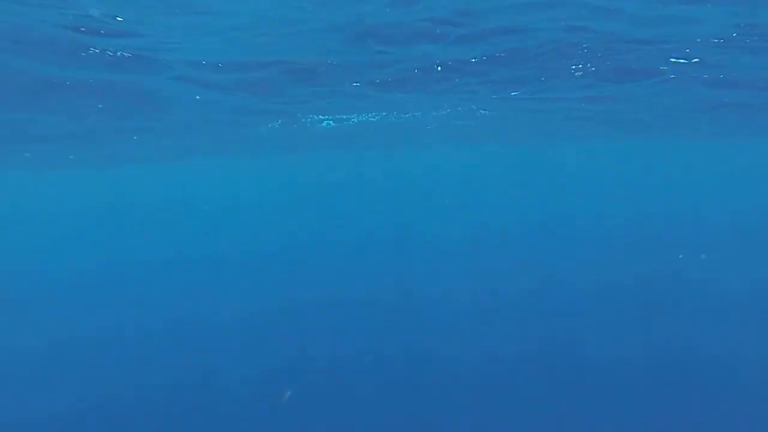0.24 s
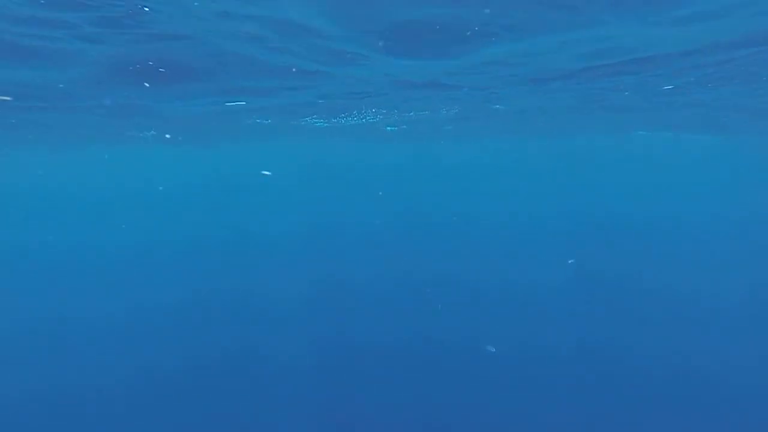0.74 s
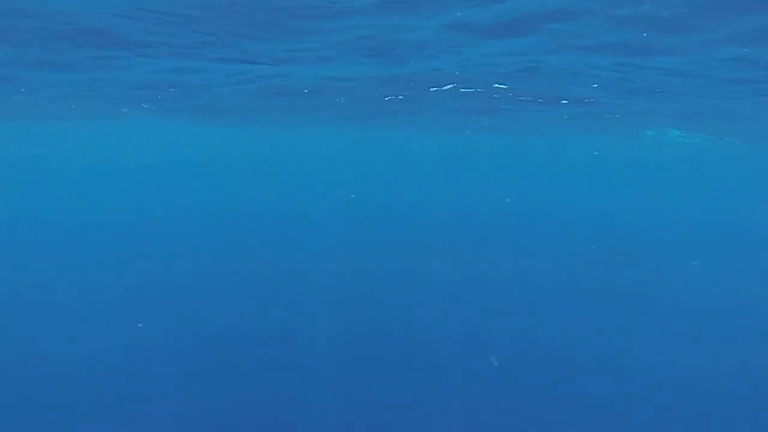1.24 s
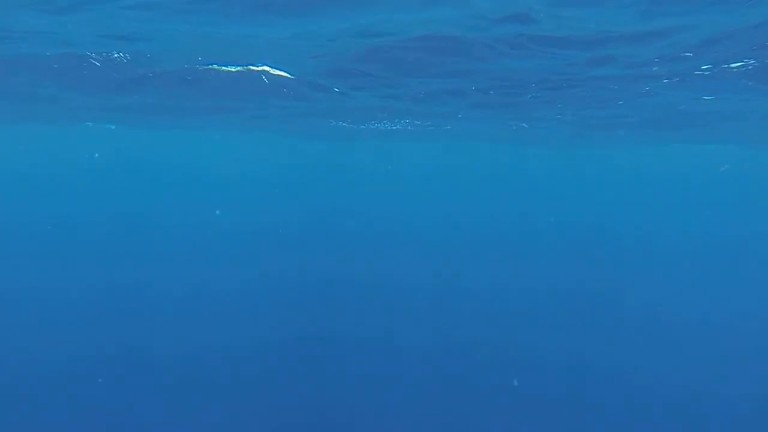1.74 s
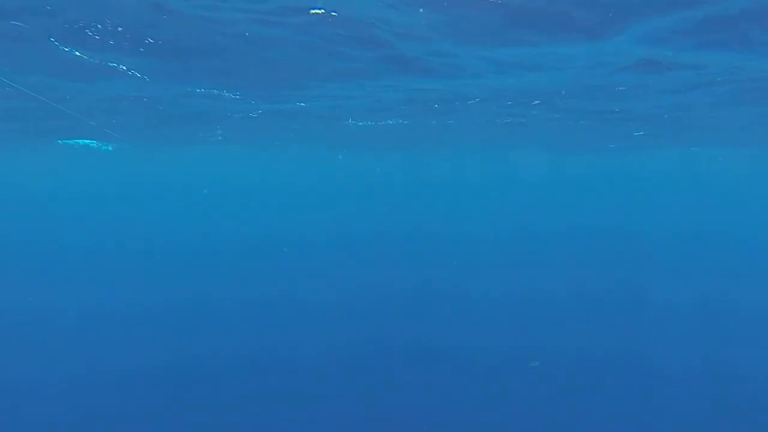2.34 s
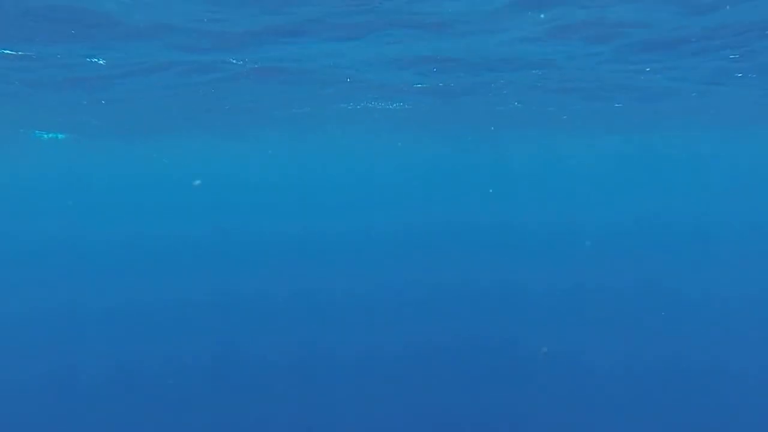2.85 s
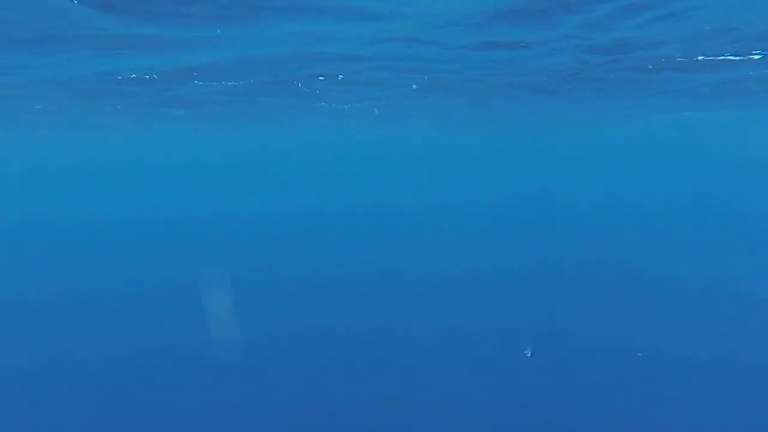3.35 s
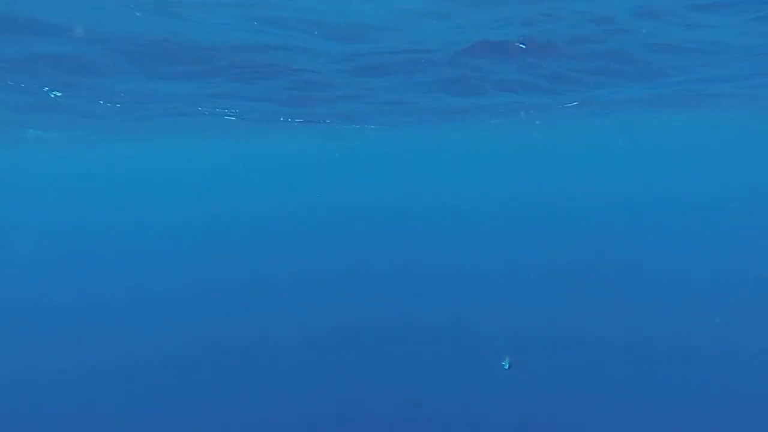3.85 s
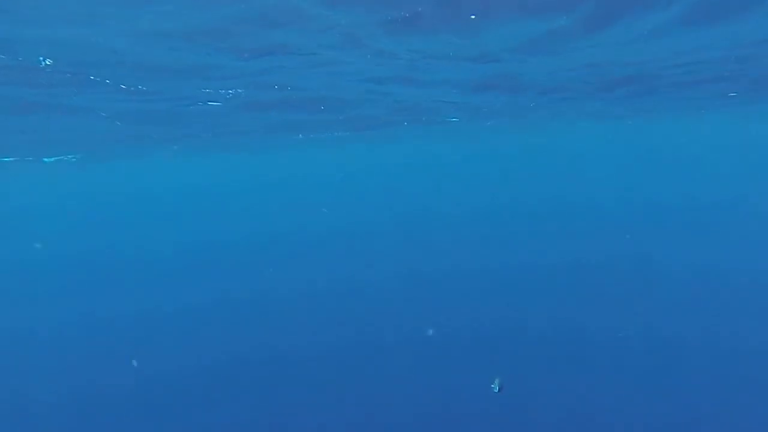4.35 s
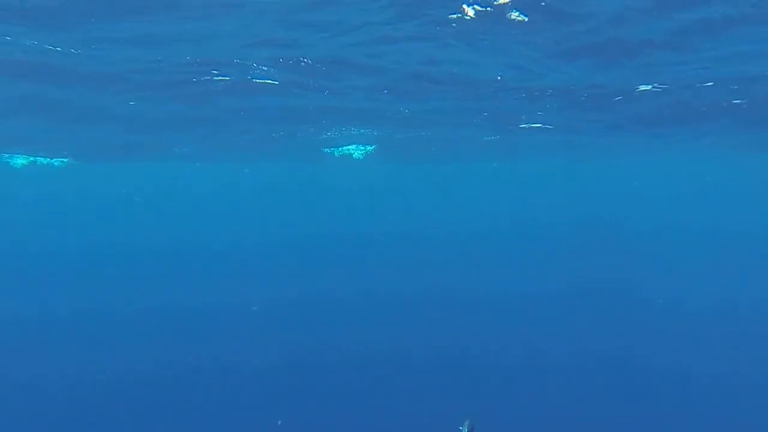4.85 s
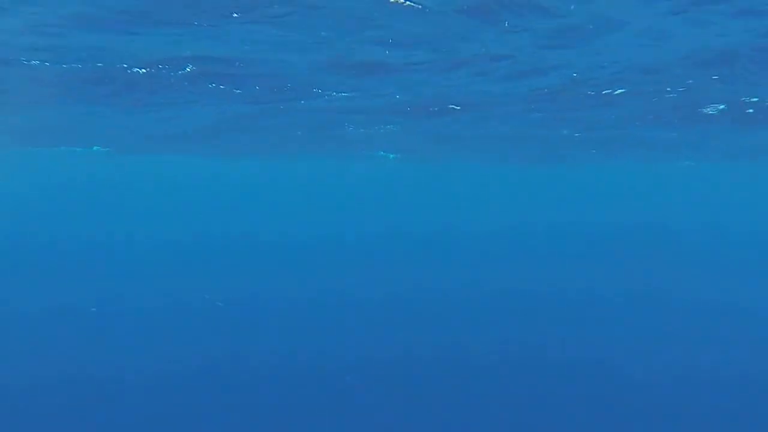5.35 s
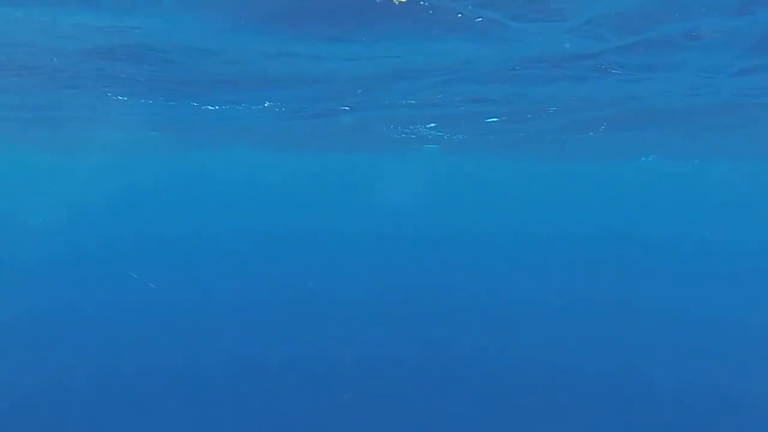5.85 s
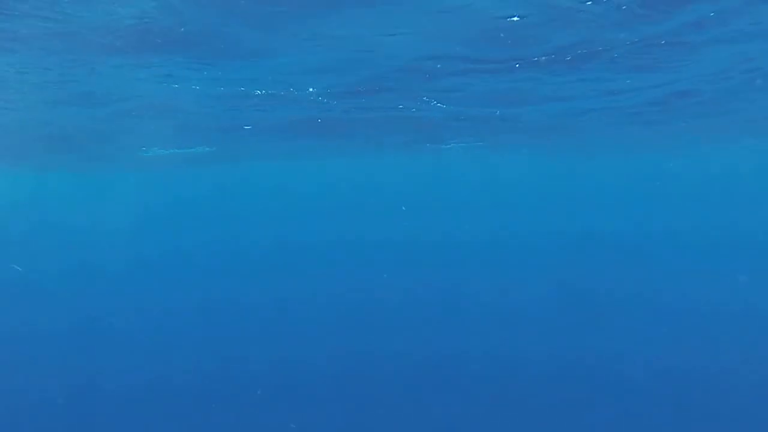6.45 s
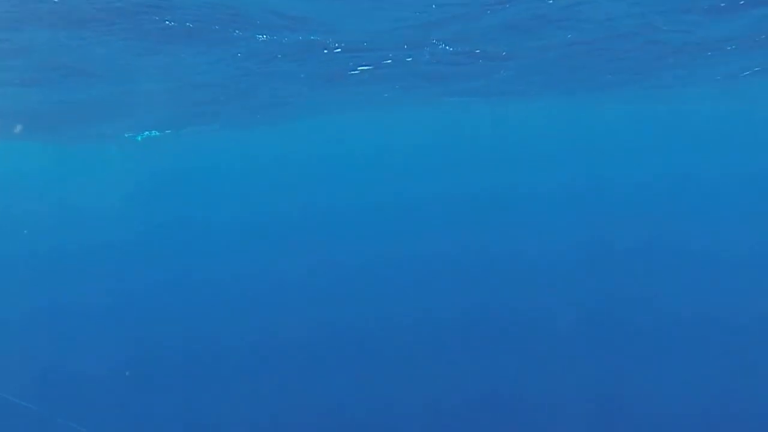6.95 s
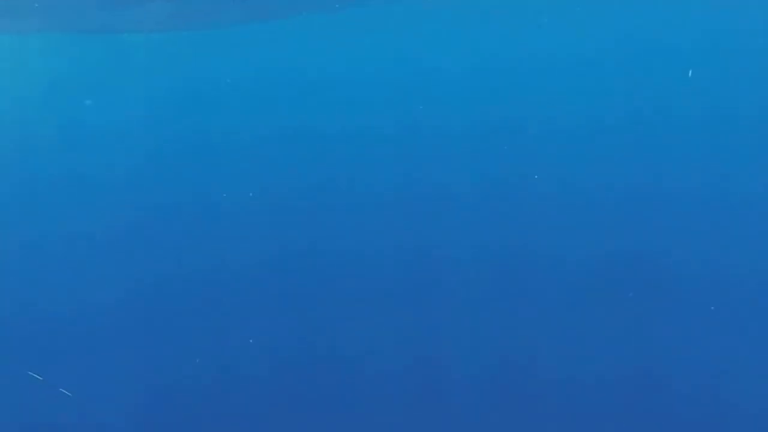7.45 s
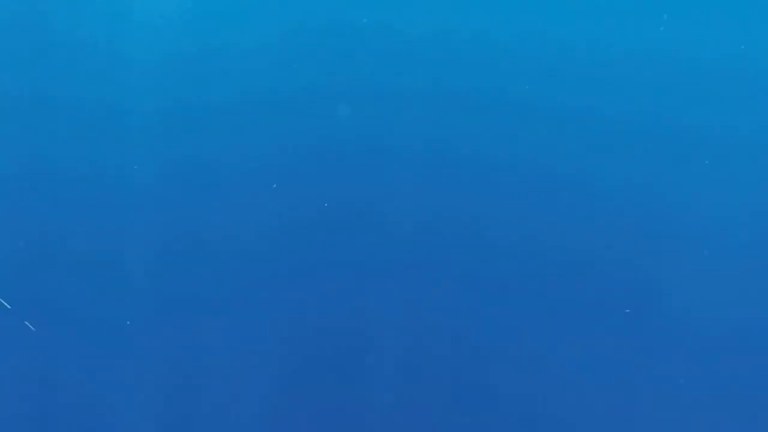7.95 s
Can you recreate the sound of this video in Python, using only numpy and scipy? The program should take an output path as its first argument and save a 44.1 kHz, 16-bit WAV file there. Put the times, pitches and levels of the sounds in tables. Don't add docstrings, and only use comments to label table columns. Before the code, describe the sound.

A deep, uneven diesel drone with rapid dull clatter heard beneath the waves, swelling and fading, with low watery thuds and a few tiny clicks.

```python
import sys
import numpy as np
from scipy import signal
from scipy.fft import rfft, irfft, next_fast_len
from scipy.io import wavfile
from scipy.ndimage import uniform_filter1d

SR = 44100
rng = np.random.default_rng(int(sys.argv[2]) if len(sys.argv) > 2 else 0)


def wav_out(sig):
    wavfile.write(sys.argv[1], SR, np.round(np.clip(np.atleast_2d(sig).T, -1, 1) * 32767).astype(np.int16))


def ratio(d):
    e = np.asarray(d, float) / 20
    return 10 ** e


N = 361619

FIRING_HZ, CYLINDERS = 35, 6
CYCLE_HZ = FIRING_HZ / CYLINDERS


def level(x, db):
    return x * ratio(db) / np.sqrt(np.mean(x ** 2))


def shape_db(table, hz):
    f, db = np.transpose(table)
    return np.interp(np.log(np.maximum(hz, 1)), np.log(f), db)


def noise(table):
    size = next_fast_len(N, True)
    hz = np.arange(size // 2 + 1) * SR / size
    spectrum = rfft(rng.standard_normal(N), size) * ratio(shape_db(table, hz))
    return level(irfft(spectrum, size)[:N], 0)


def ring(x, hz, width_hz):
    b, a = signal.iirpeak(min(hz, .45 * SR), hz / width_hz, fs=SR)
    return signal.lfilter(b, a, x)


def walk(rate):
    k = int(SR / rate)
    held = np.repeat(rng.standard_normal(N // k + 1), k)
    return 1.53 * uniform_filter1d(uniform_filter1d(held, k), k)[:N]


# (time [s], lag [ms])
HUNTING = [(0, -13.1), (.3, -10.7), (.66, -10.1), (1.38, -17.3), (2.1, -10), (2.38, -12), (2.8, -19.3),
           (3.0, -19.4), (3.45, -15.1), (4.35, -16.9), (4.68, -14), (5.55, -19.5), (5.97, -16), (6.22, -9),
           (6.85, -16), (7.2, -16.2), (7.75, -14.1), (8.0, -16.1)]


def crank(t):
    lag_ms = uniform_filter1d(np.interp(t, *np.transpose(HUNTING)), SR // 8)
    return CYCLE_HZ * (t - lag_ms / 1000)


# (order [cycles], level re its band [dB])
STRONG_ORDERS = [(6, -8), (12, -6), (15, -8.5), (18, -7.5), (21, -5.5), (30, -15.5), (36, -19),
                 (42.15, -14.5), (48, -25), (54.2, -18), (58, -31), (66, -34)]
# (frequency [Hz], level re its band [dB])
UNEVEN_CYLINDERS = [(30, -18), (60, -17), (110, -21), (150, -23), (205, -23), (240, -30), (330, -36),
                    (400, -44)]
LAYER_EDGES = [60, 110]
HULL_BORNE = [42.15, 54.2]
BEAT_ORDER, BEAT_S, BEAT_NULL_S, BEAT_DEPTH = 42.15, .591, 7.0, 0.82


def drone(cycles, gains):
    strong = np.array(STRONG_ORDERS)
    weak = np.setdiff1d(np.arange(5, 72), np.round(strong[:, 0]))
    weak_db = shape_db(UNEVEN_CYLINDERS, weak * CYCLE_HZ) + 3.25 * rng.standard_normal(len(weak))
    orders = np.r_[strong[:, 0], weak]
    levels_db = np.r_[strong[:, 1], weak_db]
    out = 0
    for order, db in zip(orders, levels_db):
        gain = gains[np.searchsorted(LAYER_EDGES, order * CYCLE_HZ)]
        if order in HULL_BORNE:
            gain = np.sqrt(gain * np.mean(gain)) * ratio(2.2 * walk(9) - .5)
        fade = 1 + .22 * walk(4)
        if order == BEAT_ORDER:
            beat = np.sin(np.pi * (np.arange(N) / SR - BEAT_NULL_S) / BEAT_S)
            fade = fade * (np.sqrt(2) * BEAT_DEPTH * beat + 1 - BEAT_DEPTH)
        tone = np.cos(2 * np.pi * (order * cycles + rng.random()))
        out = out + np.sqrt(2) * ratio(db) * gain * fade * tone
    return out


# (lead [ms], knock [dB], delay of second knock [ms], its level [dB],
# extra level on the heavy panels [dB])
CYLINDER_HABIT = [(5, .8, 4, -4, .5), (6.5, -.2, 6, -2.5, -1.5), (4.8, 1.3, 4, -4.5, 3),
                  (6.5, -1.2, 6.5, 0, -1.5), (5, -1, 5, -2.5, 2.5), (6.5, -.6, 8, -3, -3)]
# (time ahead of the knock [ms], level re the knock [dB],
# level of the knock in the valve cover [dB])
VALVE_SEATING = [(8.5, -8, -1), (5, -14, 1), (9, -9, -3), (8, -17, -3), (7.5, -8, 3), (9, -19, -2)]
# (time [s], level [dB])
HARD_FIRINGS = [(0.044, -1.8), (0.188, -2.3), (0.246, -2.0), (0.533, 2.9), (0.704, -2.0), (1.043, 2.9),
                (1.185, -1.6), (1.671, -1.7), (2.36, -2.2), (2.472, 2.4), (2.697, -2.8), (2.866, -3.0),
                (2.923, 3.4), (2.952, 2.9), (3.384, -2.5), (3.442, -1.8), (3.471, -2.1), (3.528, 2.5),
                (3.556, -2.7), (3.613, -3.0), (3.756, -2.4), (3.813, -1.7), (4.297, 5.2), (4.499, 2.7),
                (4.956, 2.6), (5.154, -1.9), (5.24, 2.3), (5.296, -1.8), (5.382, -2.0), (5.524, -2.9),
                (5.667, -1.8), (5.725, 2.7), (5.811, -1.6), (5.84, -2.3), (5.869, -2.5), (5.955, 2.4),
                (6.19, -2.5), (6.304, -1.7), (6.361, 2.3), (6.474, -3.7), (6.53, 2.3), (6.87, -1.8),
                (7.041, 3.6), (7.127, -1.9), (7.155, 2.9), (7.499, -2.5), (7.557, -3.9), (7.585, 2.3),
                (7.671, -1.7), (7.729, -1.8), (7.757, -2.3), (7.786, 3.4), (7.871, -2.6), (7.899, 2.4),
                (7.927, 2.5), (7.984, -1.7)]


def blows(cycles):
    firing = np.arange(1, int(cycles[-1] * CYLINDERS) + 1)
    at = np.interp(firing / CYLINDERS, cycles, np.arange(N)) / SR
    accent_db = np.zeros(len(firing))
    for s, db in HARD_FIRINGS:
        accent_db[np.argmin(np.abs(at - s))] = 1.1 * db
    chance = rng.standard_normal((len(firing), 6))
    age = np.arange(SR // 20) / SR
    habit = rng.standard_normal((CYLINDERS, len(age)))
    share = .4
    push = np.hanning(15) / 7
    crack_decay = (1 - np.exp(-age / 0.001)) * (np.exp(-age / 0.0028) + ratio(-14) * np.exp(-age / 0.034))
    rattle_decay = ratio(9.5) * (1 - np.exp(-age / 0.00077)) * np.exp(-age / 0.0067)
    bright, dull, rasp, cover = np.zeros((4, N + SR))
    for k, s, luck, hard_db in zip(firing % CYLINDERS, at, chance, accent_db):
        lead_ms, db, after_ms, after_db, dull_db = CYLINDER_HABIT[k]
        ahead_ms, valve_db, cover_db = VALVE_SEATING[k]
        cracks = np.sqrt(share) * habit[k] + np.sqrt(1 - share) * rng.standard_normal(len(age))
        single = cracks * crack_decay
        single[:len(push)] += ratio(26) * push
        later = int(np.clip(after_ms + 0.47 * luck[0], 1, 20) * SR / 1000)
        blow = single.copy()
        blow[later:] += ratio(after_db + 0.22 * luck[1]) * single[:-later]
        rattle = cracks * rattle_decay

        i = int((s - (lead_ms - .8 + .4 * luck[2]) / 1000) * SR)
        late = i + SR // 1200
        early = i - int(ahead_ms * SR / 1000)
        bright[i:i + len(age)] += ratio(db + hard_db + 0.22 * luck[3]) * blow
        dull[late:late + len(age)] += ratio(db + hard_db + dull_db + 0.25 * luck[4]) * blow
        rasp[i:i + len(age)] += ratio(1.2 * (db + hard_db)) * rattle
        cover[i:i + len(age)] += ratio(cover_db + .6 * hard_db) * (rattle + 0.67 * blow)
        tick = ratio(valve_db + 2.6 * luck[5]) * single
        for path, path_db in ((bright, -3), (dull, -1.5), (rasp, -2.5), (cover, 5)):
            path[early:early + len(age)] += ratio(path_db) * tick
    return bright[:N], dull[:N], rasp[:N], cover[:N]


def mode(x, hz, width_hz, db):
    return ratio(db) * ring(ring(x, hz, 2.18 * width_hz), hz, 1.32 * width_hz) / np.sqrt(width_hz)


HULL_CENTRES = [400, 520, 660, 735, 880, 1180, 1355, 1650, 1945]
# (width [Hz], level [dB])
HULL_MODES = [(130, -1), (100, 1.5), (96, 2.5), (58.5, -12.5), (88, -5), (156, -23), (120, 3.5),
              (134.6, 9.5), (127, -0.5)]
INVERTED_PANELS = [880]
# (frequency [Hz], width [Hz], level [dB])
THIN_PLATES = [(2586, 84, -23), (2720, 140, -21), (2920, 170, -22.5), (3263, 200, -22), (3644, 190, -25),
               (4140, 180, -28), (4260, 820, -39)]
# (frequency [Hz], width [Hz], level [dB])
VALVE_COVER = (2250, 170, -18.5)
LATE_PANEL_HZ, LATE_SAMPLES = 1945, 6
PLATE_STEADY = 0.71


def knock(cycles, gain):
    bright, dull, rasp, cover = blows(cycles)
    wash = ratio(-10) * rng.standard_normal(N)
    hull = 0
    for hz, (width_hz, db) in zip(HULL_CENTRES, HULL_MODES):
        force = dull + .55 * wash if hz < 1000 else bright + wash
        if hz == LATE_PANEL_HZ:
            force = np.roll(force, LATE_SAMPLES)
        sign = -1 if hz in INVERTED_PANELS else 1
        hull = hull + sign * mode(force, hz, width_hz, db)
    plates = -mode(cover + wash, *VALVE_COVER)
    for k, row in enumerate(THIN_PLATES):
        plates = plates + (-1) ** k * mode(rasp + 2 * wash, *row)
    escape = (np.mean(gain) / gain) ** PLATE_STEADY
    return gain * level(hull + plates * escape, 0)


# (order [cycles], level re the middle layer [dB])
GEAR_MESH = [(89.7, -40), (125.5, -34), (151, -35), (156, -38)]


def gears(cycles):
    out = 0
    for order, db in GEAR_MESH:
        out = out + np.sqrt(2) * ratio(db + walk(5.3)) * np.cos(2 * np.pi * order * cycles)
    return out


# (frequency [Hz], density [dB per Hz])
DEEP_RUMBLE = [(6, -7.5), (16, -29), (26, -5.5), (38, 13), (50, -8), (65, -19), (90, -39.5), (300, -120)]
# (frequency [Hz], density [dB per Hz])
LOW_SLOSH = [(25, -55), (45, -39.5), (62, -28.5), (85, -10), (105, -1.5), (120, -5.5), (150, -50),
             (400, -120)]
# (frequency [Hz], density [dB per Hz])
CHURNED_WATER = [(50, -58.5), (90, -22.5), (110, -20), (125, -24.5), (150, -31), (200, -37), (300, -38.5),
                 (370, -38.5), (600, -46), (1050, -50), (3000, -130)]


def water(deep, low, middle):
    rumble = ratio(-2.5) * deep * noise(DEEP_RUMBLE)
    slosh = ratio(-5.5) * low * noise(LOW_SLOSH)
    churn = ratio(-10.5) * middle * noise(CHURNED_WATER)
    return rumble + slosh + churn


# (time [s], level [dB])
SWELL_LEVEL = [(0, -2), (.8, 2.5), (1.6, -0.5), (2.0, 0.7), (2.4, 1.5), (2.94, 4.5), (3.15, 3.5),
               (3.45, -3), (3.82, -4), (4.2, 3), (4.6, 4), (4.92, 3), (5.2, -0.5), (5.75, -1), (6.2, 3),
               (6.95, 1), (7.6, 4), (7.98, 7)]
# (level in a mean swell [dB], share of the swell followed [ratio],
# gain while sinking [dB per s])
LAYER_LEVELS = [(-35, 0.87, 0.5), (-38, 0.55, 16.5), (-36.5, 1.75, -1), (-48.5, 0.61, -0.7)]
# (time [s], length [s], deep level change [dB], low level
# change [dB])
LAYER_SWINGS = [(0.352, 0.12, 1, -3), (0.57, 0.12, -3, 4.5), (0.84, 0.053, 7, -5), (0.985, 0.16, -2, 3),
                (1.334, 0.56, 4.5, 4), (2.305, 0.33, 1, 0), (2.917, 0.19, -0.5, 1.5),
                (3.102, 0.057, -3, -1.5), (3.636, 0.068, 0, -1), (4.05, 0.15, 2.5, -5),
                (4.208, 0.11, -22, -1.5), (4.33, 0.09, 8, -1), (4.635, 0.2, 5.5, 5.5), (5.05, 0.5, -1.5, 4),
                (5.357, 0.12, 8.5, 1.5), (5.903, 0.082, 6.5, -2.5), (6.382, 0.18, -6, 1.5),
                (6.65, 0.64, 3.5, 0), (7.276, 0.47, 5.5, 0), (7.558, 0.15, -1.5, 3), (8.144, 0.4, 0.5, -4)]


def heard(t):
    swell_db = np.interp(t, *np.transpose(SWELL_LEVEL))
    sinking_s = np.maximum(t - 7.45, 0)
    db = np.array([mean_db + share * swell_db + sink_db * sinking_s
                   for mean_db, share, sink_db in LAYER_LEVELS])
    for s, length, deep_db, low_db in LAYER_SWINGS:
        db[:2] += np.outer([deep_db, low_db], np.exp(-(2 * (t - s) / length) ** 2 / 2))
    return ratio(db)


# (time of the crest [s], frequency [Hz], peak level [dB], # rise [ms], decay by
# 60 dB [s])
CASE_BUMPS = [
    (1.075, 130, -15.5, 4.5, 0.018),
    (1.078, 39.5, -16, 12, 0.5),
    (1.155, 408, -39, 9.3, 0.17),
    (1.83, 407, -55, 16, 0.3),
    (5.228, 412, -46.5, 18, 0.2),
    (3.012, 100, -15.5, 9.9, 0.23),
    (3.043, 100, -12.5, 5.6, 0.12),
    (3.044, 36.2, -13.5, 34, 0.31),
]
# (time [s], frequency [Hz], width [Hz], peak level [dB], decay by 60 dB [ms])
CASE_TICKS = [
    (2.321, 9000, 2300, -61, 4),
    (2.4703, 2900, 2800, -49, 1),
    (2.4703, 8500, 3000, -72, 1),
    (7.728, 10500, 7000, -69, 60),
    (7.729, 7900, 1200, -64, 12),
    (7.733, 7700, 1500, -62, 12),
    (7.7425, 8800, 3000, -59, 7),
    (7.7425, 12500, 4500, -64, 7),
]


def case(t):
    out = np.zeros(N)
    for s, hz, db, rise_ms, t60 in CASE_BUMPS:
        age = t - s
        rise = np.exp(-(age * 1000 / rise_ms) ** 2)
        decay = np.exp(-np.log(1000) * np.abs(age) / t60)
        out += ratio(db) * np.where(age < 0, rise, decay) * np.cos(2 * np.pi * hz * age)
    for s, hz, width_hz, db, t60_ms in CASE_TICKS:
        age, i = t[:SR // 10], int(s * SR)
        crack = np.exp(-np.log(1000) * age * 1000 / t60_ms) * rng.standard_normal(len(age))
        crack[0] = 4
        rung = ring(ring(crack, hz, width_hz), hz, width_hz)
        out[i:i + len(age)] += ratio(db) * np.sqrt(SR / width_hz / 2) * rung
    return out


# (frequency [Hz], density [dB per Hz])
PREAMP_HISS = [(300, -106), (2500, -106), (4000, -108), (5000, -110), (6500, -113), (8000, -116),
               (9500, -119), (10200, -118), (12000, -120), (13000, -124), (14000, -131), (15000, -135),
               (16000, -150)]
BUZZ_LEVELS = [-78.5, -78.5]
FRAME_HZ, BUZZ_HZ = 60 / 1.001, 5699
BUZZ_START, BUZZ_SHARE = .8, .4


def camera(t):
    frames = t * FRAME_HZ - BUZZ_START
    frame = frames % 1
    on = uniform_filter1d(1. * (frame < BUZZ_SHARE), 20)
    slip = .55 * rng.standard_normal(N // 500)[(frames + 1).astype(int)] + .5 * walk(5)
    buzz = 0
    for harmonic, db in enumerate(BUZZ_LEVELS, 1):
        phase = 2 * np.pi * BUZZ_HZ * frame / FRAME_HZ + slip
        buzz = buzz + ratio(db) * np.sin(harmonic * phase)
    return level(noise(PREAMP_HISS), -68.5) + on * buzz


def scene():
    t = np.arange(N) / SR
    deep, low, middle, high = heard(t)
    cycles = crank(t)
    engine = drone(cycles, (deep, low, middle)) + knock(cycles, high) + middle * gears(cycles)
    return (engine + water(deep, low, middle) + case(t) + camera(t))[None]


def band_limit(x):
    return signal.sosfilt(signal.butter(12, 15000, fs=SR, output="sos"), x)


def record(dry):
    bass_cut = signal.butter(2, 8, "high", fs=SR, output="sos")
    mix = signal.sosfilt(bass_cut, dry)
    return band_limit(mix)


dry = scene()
out = record(dry)
wav_out(out)
```